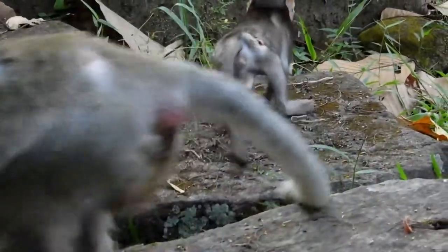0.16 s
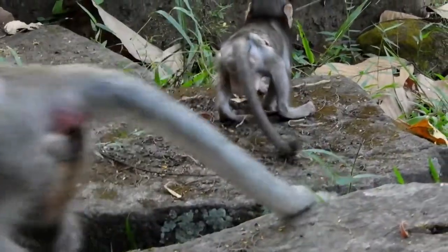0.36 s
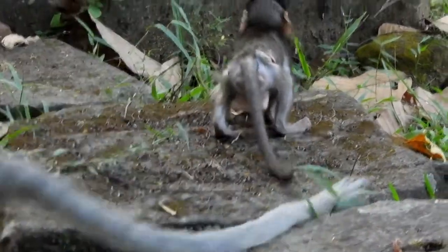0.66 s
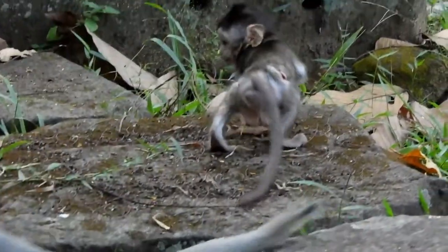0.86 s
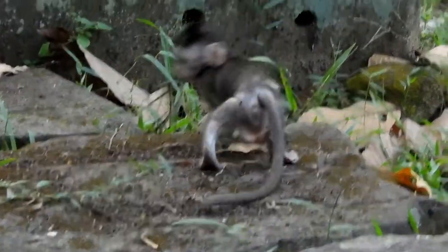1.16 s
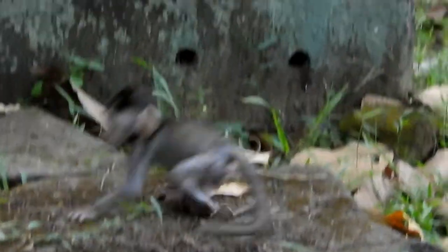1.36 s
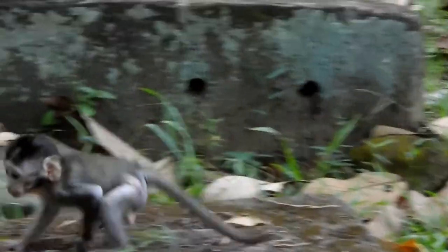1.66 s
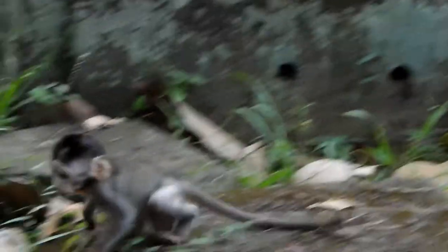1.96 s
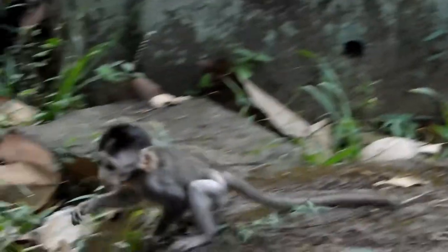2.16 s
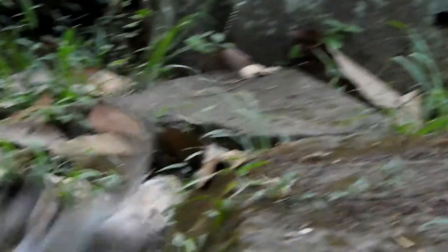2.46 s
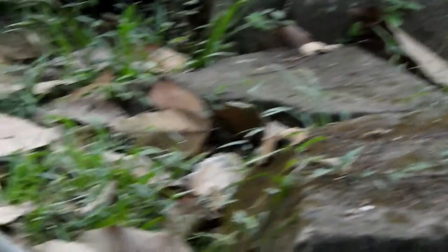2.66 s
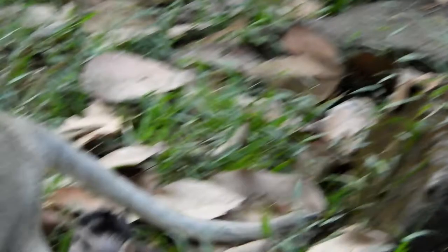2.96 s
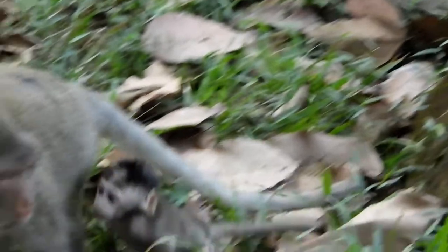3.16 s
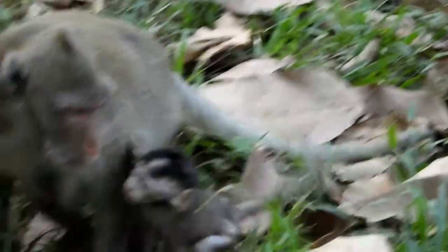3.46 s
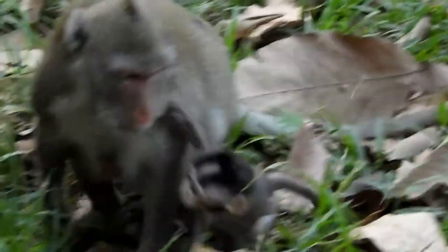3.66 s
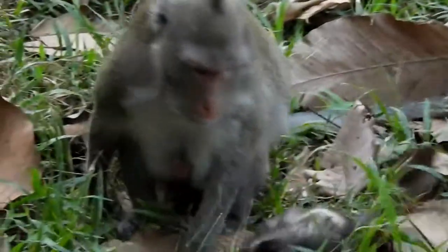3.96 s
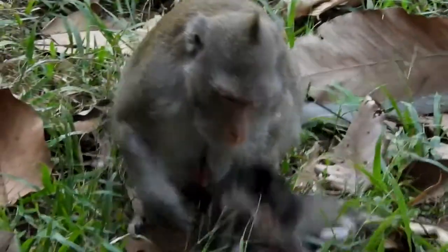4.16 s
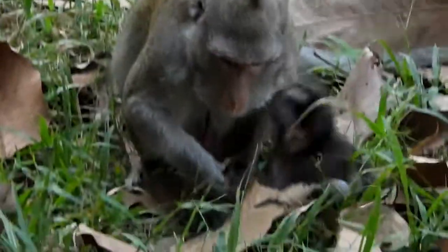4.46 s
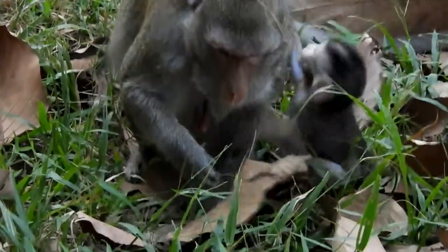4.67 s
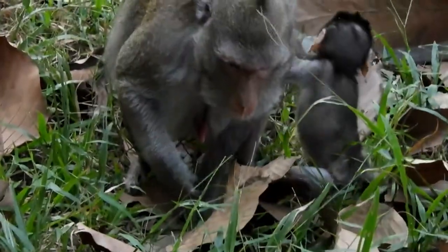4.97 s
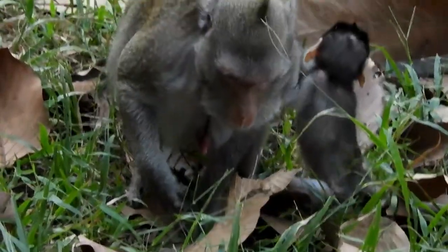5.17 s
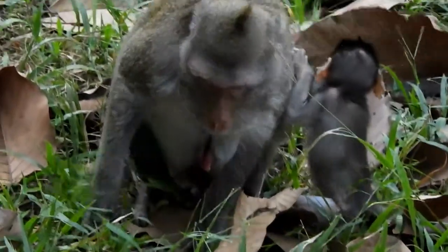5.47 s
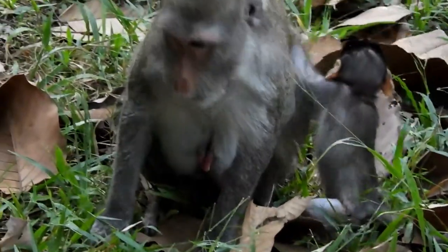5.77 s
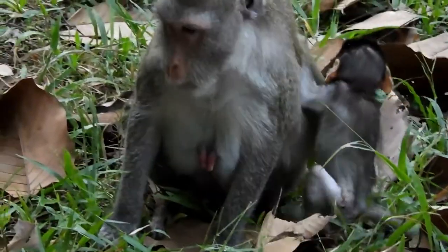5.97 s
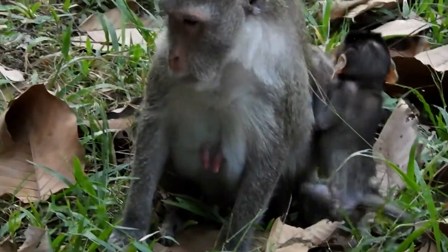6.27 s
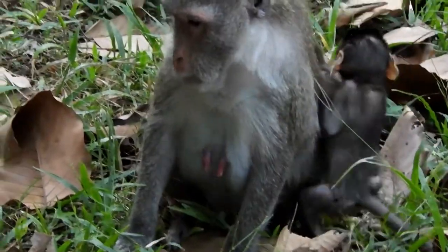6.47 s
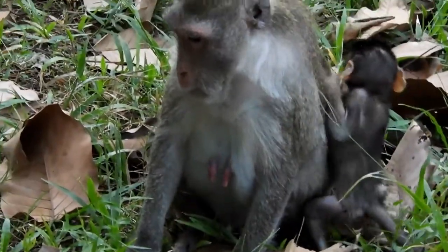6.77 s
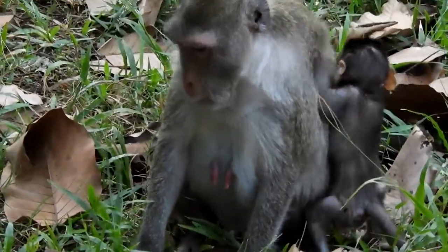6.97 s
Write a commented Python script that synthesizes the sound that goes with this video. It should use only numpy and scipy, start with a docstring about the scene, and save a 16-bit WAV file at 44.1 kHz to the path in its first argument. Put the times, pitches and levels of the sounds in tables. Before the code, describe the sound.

Throughout, cicadas hold a piercing drone near 2.7 kHz with thinner pitches above, beating, rasping and fading unevenly as they shift between the ears. Behind are blurred insect bands, airy hiss, patchy leaf litter and a low rumble with a far engine throbbing about 22 times a second. From 0 to 2.4 s, small soft feet pat dully on stone, with a crisp double snap at 1.25. At 2.5-2.6 a knock and a run of brittle snaps mark the move into dry leaves. Light crackles follow around 3.0 and 3.4; the strongest crunches and snaps come at 3.75-3.85 and 3.95. A knock and slight rustle land at 4.62, then only faint pats. Faint hoots near 2.8-3.6 and thin whistles at 4.7, 5.1, 6.3 and 6.9 barely surface. The motor slows after 5.5. Stereo, nearby steps with short, soft woodland echo.

```python
"""Woods: a monkey and its baby walk from a stone slab onto grass and dry leaves under droning cicadas.
Feet are noise-struck knocks, leaves are crackles through resonances, snaps are millisecond noise bursts.
The woods answer with a short, soft echo. Cicadas are beating sines in four partials, faded by foliage.
Behind lie blurred insect bands, coloured noise for rumble, litter, an uneven mid-high floor and hiss,
faint gliding whistles and hoots, and the low throb of a distant motor made of low-passed thumps."""
import sys
import numpy as np
from scipy import signal
from scipy.fft import rfft, irfft
from scipy.io import wavfile
from scipy.ndimage import uniform_filter1d

SR = 44100
rng = np.random.default_rng(int(sys.argv[2]) if len(sys.argv) > 2 else 0)


def materialize(psi):
    """Save the field psi as 16-bit PCM at rate SR to the path in sys.argv[1].

    A 1-D psi becomes a single channel; in a 2-D psi each row is a channel.
    """
    bounded = np.clip(np.atleast_2d(psi).T, -1, 1)
    quanta = np.round(bounded * 32767).astype(np.int16)
    wavfile.write(sys.argv[1], SR, quanta)


N = 313992
TIME = np.arange(N) / SR
FREQS = np.fft.rfftfreq(N, 1 / SR) + 1e-3  # offset keeps log finite

# Pan is left re right, positive = left. Spectra and resonances are relative.
# dry leaves crushed or brushed: t/s, crackle level/dB, leaf body level/dB, swell/s, decay/s, pan/dB
CRUNCHES = [(0.86, -49, -70, 0.0071, 0.027, 7), (0.92, -51, -73, 0.0073, 0.034, 7),
            (1.237, -31.5, -69, 0.013, 0.014, 8), (1.29, -43.5, -57, .006, 0.052, 4),
            (1.463, -63, -59.5, 0.014, 0.13, 2), (2.505, -38, -43, 0.0088, 0.15, 1),
            (2.848, -68, -45.5, 0.012, 0.006, 5), (2.978, -43, -52, 0.0043, 0.01, 3),
            (3.352, -59, -40.5, 0.0056, 0.011, 1), (3.466, -43, -43, 0.0028, .035, -2),
            (3.69, -49, -49, 0.033, 0.076, 0), (3.771, -45, -50, 0.0055, 0.021, -10),
            (3.798, -40, -31.5, 0.004, 0.021, 4), (3.809, -30, -34, 0.022, 0.013, -2),
            (3.948, -28, -27.5, 0.011, 0.0079, 0.5), (3.968, -37.5, -40, 0.0031, 0.062, -2.5),
            (4.616, -52, -45, 0.0018, 0.013, 0), (4.66, -60, -64, 0.0078, 0.23, -5),
            (5.297, -46.5, -55.5, 0.0031, 0.014, -11)]
# thin leaf edges: f/Hz, width/Hz, gain/dB
LEAF_EDGE = [(7230, 3100, -9.5), (8540, 770, 1.5), (9180, 520, 2)]
# broad leaf blades: f/Hz, width/Hz, gain/dB
LEAF_BODY = [(700, 180, -8), (915, 250, -2.5), (1220, 82, 4.5), (1570, 170, 0.5), (1890, 260, 1.5),
             (2230, 260, 2.5), (2500, 160, -1), (3400, 290, 3), (3830, 190, 3.5), (4380, 400, 5),
             (5370, 530, -6), (6560, 610, 4)]
# footfalls and knocks on stone, then on litter: t/s, level before trim/dB, f/Hz, contact/s, pan/dB
FOOTFALLS = [(0.027, -48, 1000, 0.0052, 2), (0.112, -51, 1140, 0.0052, 9), (0.311, -54, 1170, .004, 6),
             (0.427, -47.5, 1040, 0.0071, -2), (0.514, -47.5, 1150, 0.0024, 10),
             (0.606, -46, 2030, 0.0057, 2), (0.717, -49, 1860, .004, 7), (0.916, -41.5, 2000, 0.0053, 0),
             (1.228, -45.5, 1150, .005, -1), (1.631, -53, 1170, 0.0061, 5), (1.711, -50, 1070, 0.0069, 5),
             (1.909, -48.5, 1030, 0.005, 3), (2.028, -51, 1190, 0.007, 5), (2.111, -50.5, 1240, .004, -1),
             (2.32, -51.5, 1060, 0.0058, 6), (2.437, -52, 1060, 0.0048, 7), (2.5, -34, 1470, .006, 2),
             (2.68, -42, 1460, 0.0048, 4), (2.844, -45, 1730, .004, -3), (2.912, -46, 970, .004, 10),
             (3.355, -39.5, 1220, 0.0031, -4), (3.411, -36.5, 2340, 0.0022, -2),
             (3.7, -37.5, 1400, 0.013, -2), (3.802, -26.5, 1400, 0.0022, 1),
             (3.803, -37.5, 710, 0.0052, -1), (3.808, -27, 1430, 0.004, -3),
             (3.85, -33.5, 1550, 0.0012, -1), (3.95, -31, 2130, .003, -7),
             (4.615, -31.5, 1430, 0.0028, -2.5), (4.618, -37, 2500, 0.0037, 2),
             (4.653, -43, 1520, 0.0051, -2), (4.781, -52, 1130, 0.0032, 6), (4.98, -51, 1300, 0.0055, 4),
             (5.583, -53, 1130, .004, 5), (5.709, -52.5, 2100, .004, 11), (6.384, -50, 1580, 0.0046, 0)]
# stems and leaf ribs snapping: t/s, peak level before trim/dB, pan/dB
STEM_SNAPS = [(1.2445, -30, 5), (1.2544, -21, 2), (2.517, -26, -8), (2.526, -22, -1.5), (2.541, -33, 2),
              (2.568, -32, -2), (2.589, -25, 0), (2.595, -26, 1), (2.611, -31, 2), (2.98, -26.5, -14),
              (3.3648, -30, 3), (3.474, -27, -6), (3.754, -32, -5), (3.77, -23.5, -6), (3.8125, -17, -4),
              (3.822, -26, -3), (3.828, -22, -4), (3.841, -22, -4), (3.957, -22, -6), (3.9613, -15, -3),
              (3.975, -15.5, -5)]
# cicada partial 1, which fades the most: t/s, level before partial gain/dB
DRONE_FIRST = [(0.0, -64), (0.48, -49), (0.52, -56), (0.6, -46.5), (0.68, -61), (0.96, -53.5), (1.04, -70),
               (1.22, -63), (1.48, -62), (1.54, -54.5), (1.72, -52), (1.9, -65), (2.14, -50), (2.36, -64.5),
               (2.42, -50), (2.5, -61), (2.54, -44), (2.6, -60), (2.68, -48.5), (2.8, -59.5), (2.88, -51),
               (3.04, -58.5), (3.18, -46.5), (3.22, -62), (3.3, -45.5), (3.42, -65), (3.46, -49),
               (3.66, -61), (3.84, -39), (3.9, -53), (3.94, -41.5), (4.1, -62), (4.2, -52.5), (4.38, -81),
               (4.52, -69), (4.62, -49), (4.74, -60), (4.94, -49), (5.1, -62), (5.2, -46), (5.24, -67),
               (5.32, -47), (5.42, -68), (5.48, -53.5), (5.54, -81), (5.66, -55.5), (5.76, -65),
               (5.82, -42), (5.9, -60.5), (5.98, -46), (6.04, -63), (6.1, -49), (6.18, -66.5), (6.34, -49),
               (7.02, -59.5), (7.11, -48)]
# cicada partial 2, piercing: t/s, level before partial gain/dB
DRONE_SECOND = [(0.0, -57), (0.06, -62), (0.12, -43.5), (0.2, -54), (0.3, -45), (0.48, -53), (0.52, -46),
                (0.6, -50.5), (0.84, -47), (0.96, -44.5), (1.0, -54), (1.1, -46.5), (1.38, -52),
                (1.42, -46), (1.68, -44.5), (1.94, -53.5), (2.0, -45.5), (2.14, -49.5), (2.18, -39),
                (2.28, -54), (2.34, -46.5), (2.5, -53), (2.54, -45.5), (2.64, -55), (2.86, -43.0),
                (3.02, -51), (3.1, -44.5), (3.2, -53), (3.34, -49), (3.4, -56.5), (3.54, -43.5),
                (3.76, -52), (3.82, -43.5), (4.12, -48.5), (4.2, -44), (4.26, -54), (4.3, -43),
                (4.46, -55.5), (4.6, -44), (4.7, -54.5), (4.84, -44.5), (5.18, -49.5), (5.22, -45),
                (5.36, -55.5), (5.44, -43), (5.56, -51), (5.7, -50), (5.74, -42.5), (6.08, -51),
                (6.18, -46), (6.38, -53), (6.48, -47), (6.54, -57), (6.74, -42), (6.92, -48), (7.11, -50.5)]
# cicada partial 3, thin: t/s, level before partial gain/dB
DRONE_THIRD = [(0.0, -49), (0.22, -53.5), (0.46, -44.5), (0.86, -57), (0.96, -45), (1.02, -72), (1.1, -58),
               (1.22, -45), (1.32, -44), (1.44, -56), (1.48, -50), (1.74, -64), (1.78, -48.5),
               (2.82, -51.5), (2.9, -44.5), (2.96, -53), (3.02, -43), (3.08, -56), (3.12, -46.5),
               (3.74, -49), (3.8, -46.5), (3.94, -47), (4.5, -49), (4.58, -66), (4.64, -44), (4.72, -58),
               (4.78, -45), (5.2, -54), (5.34, -48), (5.42, -54), (5.48, -49), (6.26, -48.5), (6.32, -57),
               (6.52, -47), (6.68, -53), (6.76, -40), (6.84, -57), (6.88, -45), (7.08, -59), (7.11, -51)]
# four partials through the foliage: gain/dB, random fading depth/dB, rasp depth (0-1), share of pan (0-1)
PARTIALS = [(2.77, 1.0, 0.34, 1), (2.5, 0.93, 0.3, 0.98), (1.43, 1.36, 0.02, 1), (0.5, 4, 0.6, 0.31)]
# place of the three lower partials as foliage shifts: t/s, pan 1/dB, pan 2/dB, pan 3/dB
DRONE_PLACE = [(0.0, 9, -9, -7), (0.2, 25, 1.0, -4), (0.28, -4, 1.5, -2.5), (0.48, 16, -1.5, -1),
               (1.13, -10, 4, -1.0), (1.25, 4.0, 2.0, 0), (1.47, -3.5, 4.5, 5), (1.55, 10.0, 6, 1.0),
               (1.86, -6, -6, 3), (2.04, 10, 3.0, -4), (2.14, -6, -3, 9), (2.28, 11, 6, 0.5),
               (2.7, -10, -1.0, 0.5), (2.74, 4.5, 3, -2.0), (4.96, 0, 0.5, -2.5), (5.02, 2, -3.0, -9),
               (5.47, 12, 4, -3), (5.51, 5, -12, 1), (6.13, 5, 8, -4), (6.21, 9, -5.0, -1.5),
               (6.45, 2, 2.5, -1), (6.5, 9, 2.0, -8), (7.08, 3, 1, 1.0), (7.12, 13.5, -2.5, -13)]
# farther, looser insect chorus: f/Hz, width/Hz, level/dB
FAR_CHORUS = [(2617, 140, -61.5), (5170, 240, -53.5), (5490, 310, -59.5), (5990, 72, -66.5),
              (6420, 120, -73), (7867, 590, -52.5), (8580, 230, -68), (9100, 560, -68.5)]
# faint far whistles and hoots: t/s, length/s, start f/Hz, end f/Hz, level before blur/dB
WHISTLES = [(2.83, 0.42, 685, 645, -63), (3.22, 0.42, 635, 660, -65), (4.66, 0.12, 3420, 3400, -59),
            (5.13, 0.22, 3670, 3510, -55), (6.297, 0.344, 3870, 3830, -58), (6.93, 0.24, 1930, 1830, -60)]
# uneven mid-high noise floor, 3-5 kHz: t/s, level before trim/dB
MID_HIGH_LEVEL = [(0.0, -65), (0.32, -56.5), (0.36, -61), (0.6, -56.5), (0.84, -61.5), (0.88, -54),
                  (1.16, -66), (1.28, -60), (1.46, -74), (1.52, -52), (1.64, -66), (1.94, -55.5),
                  (2.2, -60), (2.48, -57), (2.7, -51.5), (2.82, -69), (2.98, -49), (3.02, -57), (3.3, -60),
                  (3.36, -52), (3.44, -55), (3.54, -50.5), (3.58, -54), (3.62, -49.5), (3.74, -53),
                  (3.8, -68), (3.92, -49), (3.94, -67), (4.1, -57), (4.24, -58), (4.3, -52.5), (4.46, -69),
                  (4.58, -65), (4.66, -50), (4.82, -65), (4.9, -54.5), (5.34, -60), (5.52, -55),
                  (5.58, -59), (5.84, -54.5), (5.96, -61), (6.02, -58.5), (6.3, -65.5), (6.4, -52.5),
                  (6.6, -57), (6.66, -65.5), (6.76, -54), (7.11, -59.5)]
# mid-high colour: f/Hz, density/dB per Hz
MID_HIGH_COLOUR = [(1200, -36), (2400, -9), (3100, -6), (3700, -1), (4400, 1.5), (5000, 0.5), (6500, -2.5),
                   (12000, -52)]
# faint rustle of leaf litter: t/s, level before trim/dB
LITTER_LEVEL = [(0.0, -61.5), (0.3, -63.5), (0.42, -56.5), (0.74, -62), (0.84, -66.5), (0.96, -62.5),
                (1.2, -62.5), (1.26, -63), (1.42, -64.5), (1.48, -61.5), (1.84, -62), (1.96, -64.5),
                (2.42, -65.5), (2.5, -56.5), (2.68, -61), (2.78, -59.5), (3.04, -55.5), (3.22, -59.5),
                (3.44, -50), (3.68, -57.5), (3.8, -51), (3.92, -50), (3.94, -48), (4.1, -59.5), (4.22, -56),
                (4.48, -72.5), (4.56, -66), (4.66, -56), (4.7, -60.5), (4.8, -54.5), (4.86, -69),
                (4.96, -60.5), (5.14, -61.5), (5.58, -59.5), (5.66, -62.5), (6.0, -67.5), (6.2, -68.5),
                (6.4, -60), (6.7, -67.5), (6.74, -59), (6.96, -62.5), (6.98, -56), (7.11, -59)]
# litter colour: f/Hz, density/dB per Hz
LITTER_COLOUR = [(250, -20), (500, -15.5), (680, -11.5), (900, -6), (1350, -3), (1650, -3), (2000, -5),
                 (2400, -5), (2900, -5), (3600, -12.5), (8000, -26), (12000, -43)]
# high hiss: t/s, level before trim/dB
HISS_LEVEL = [(0.0, -52), (0.94, -52.5), (1.02, -53), (1.34, -52), (1.44, -60), (1.56, -45.5), (1.7, -55),
              (2.1, -48.5), (2.2, -55.5), (2.68, -52), (2.94, -63), (2.98, -49), (3.2, -55), (3.38, -46.5),
              (3.44, -56), (3.46, -52), (3.68, -49), (3.8, -59), (3.92, -48), (3.94, -50), (4.12, -48.5),
              (4.56, -59.5), (5.0, -53), (5.26, -63), (5.3, -52.5), (5.68, -55), (6.1, -52), (6.3, -59.5),
              (6.46, -49), (6.68, -56.5), (6.78, -51.5), (7.11, -56)]
# hiss colour: f/Hz, density/dB per Hz
HISS_COLOUR = [(3500, -31.5), (4700, -14), (5600, -7.5), (6200, -7.5), (7200, -3.5), (8350, 2), (8900, -1),
               (9500, -6), (10200, -7), (10600, -9), (10900, -8), (11400, -21.5), (12200, -34.5),
               (13800, -30), (15000, -50)]
# low rumble, also the motor's reference: t/s, level before trim/dB
RUMBLE_LEVEL = [(0.0, -65), (0.29, -69), (0.42, -57.5), (0.54, -71.5), (1.81, -68.5), (1.89, -61),
                (2.15, -73), (2.71, -64.5), (2.8, -70.5), (3.16, -61.5), (3.25, -63.5), (3.56, -58.5),
                (4.33, -57), (4.55, -67), (5.0, -60), (5.65, -66), (6.38, -63), (7.12, -70)]
# rumble colour: f/Hz, density/dB per Hz
RUMBLE_COLOUR = [(15, -43), (25, -20), (75, 0.5), (119, 0.5), (184, -5), (262, -20), (420, -22), (550, -55),
                 (920, -120)]
# likeness of the ears in diffuse noise: f/Hz, correlation (-1 to 1)
LIKENESS = [(60, 0.78), (180, 0.86), (350, 0.35), (650, 0.32), (900, 0.75), (1400, 0.62), (2500, 0.55),
            (3800, 0.15), (5200, 0.49), (7000, 0), (9000, 0), (14000, 0)]
# far motor speed, slackening near the end: t/s, firing rate/Hz
MOTOR_SPEED = [(0, 21.6), (3.0, 21.7), (4.2, 22.2), (5.2, 21.9), (5.6, 21.2), (6.0, 20.0), (6.4, 19.5),
               (7.12, 19.5)]
# motor level re RUMBLE_LEVEL: t/s, level/dB
MOTOR_SHARE = [(0, -7.5), (3.2, -5.5), (4.2, -1.5), (5.3, -2), (6.4, -5), (7.12, -6)]
# boom of the far motor: f/Hz, width/Hz, gain/dB
MOTOR_BODY = [(120.5, 104, 0)]

WOODS_T60_S, WOODS_DB = 0.18, -6


def crunches(clump_db=2.0, fold_db=2.0):
    """Weight comes onto a leaf, it crackles in clumps, and the crackle dies away."""
    edge = crackle(LEAF_EDGE, per_s=1600, size_db=3.0, shared=0.1)
    edge = cut(edge, 10600, "low", order=6)
    edge = rms_one(cut(edge, 3800, "high") * from_db(clump_db * drift(120)))
    body = crackle(LEAF_BODY, per_s=3500, size_db=1.0, shared=1.0)
    body = cut(body, 515, "high", order=4)
    body = rms_one(body * from_db(fold_db * drift(150)))
    out = np.zeros((2, N))
    t = TIME[:SR // 2]
    for start_s, edge_db, body_db, swell_s, decay_s, pan_db in CRUNCHES:
        start = round(start_s * SR)
        at = slice(start, start + SR // 2)
        press = np.minimum(t / swell_s, 1) * np.exp(-np.maximum(t - swell_s, 0) / decay_s)
        leaf = from_db(edge_db) * edge[:, at] + from_db(body_db) * body[:, at]
        add(out, start_s, panned(press * leaf, pan_db))
    return out


def crackle(modes, per_s, size_db, shared):
    """Tiny fractures of uneven size each ring one leaf resonance; a share reaches both ears alike."""
    sizes = from_db(size_db * np.minimum(rng.exponential(1, (3, N)), 3))
    sizes = sizes * rng.choice([-1, 1], (3, N))
    clicks = sizes * (rng.random((3, N)) < per_s / SR)
    ears = np.sqrt(shared) * clicks[0] + np.sqrt(1 - shared) * clicks[1:]
    dealt = rng.integers(0, len(modes), N)  # mode rung by each click
    rung = 0
    for k, mode in enumerate(modes):
        rung = rung + resonate(ears * (dealt == k) + 1e-18, [mode])
    return rms_one(rung)


def pats(trim_db=-12.5, width_hz=480):
    """A soft foot lands over a few milliseconds and knocks the ground at one dull pitch."""
    out = np.zeros((2, N))
    for start_s, level_db, pitch_hz, contact_s, pan_db in FOOTFALLS:
        pat = from_db(level_db + trim_db) * knock(pitch_hz, width_hz, contact_s)
        add(out, start_s - .001, panned(pat, pan_db))
    return out


def knock(pitch_hz, width_hz, contact_s):
    """A brief rubbing contact rings at one pitch; rms 1 over 40 ms."""
    t, mode = TIME[:SR // 25], [(pitch_hz, width_hz, 0)]
    touch = rng.standard_normal(len(t)) * t * np.exp(-t / contact_s)
    return rms_one(resonate(resonate(touch, mode), mode))


def snaps(trim_db=-4, decay_s=0.0011):
    """A stem breaks in about a millisecond: a noise burst through the leaf-edge resonances."""
    out, t = np.zeros((2, N)), TIME[:SR // 50]
    for start_s, peak_db, pan_db in STEM_SNAPS:
        burst = rng.standard_normal(len(t)) * np.exp(-t / decay_s)
        crack = cut(resonate(burst, LEAF_EDGE), 10600, "low", order=6)
        crack = crack / np.abs(crack).max()
        add(out, start_s, panned(from_db(peak_db + trim_db) * crack, pan_db))
    return out


def cicadas(count=6, pitch_hz=2699, spread_hz=11, waver_hz=12, farther_db=1.0,
            flutter_db=2.0, sway_rad=0.81, ear_lag_s=.00003, top_db=-67):
    """Singers near one pitch, each farther, beat; swaying foliage fades and shifts each partial."""
    offsets = np.linspace(1, -1, count)
    pitches_hz = [pitch_hz + spread_hz * offset + waver_hz * drift(40) for offset in offsets]
    phases = 2 * np.pi * np.cumsum(pitches_hz, axis=1) / SR
    nearness = from_db(-farther_db * np.arange(count))
    sway = sway_rad * np.array([drift(1.66) for singer in range(count)])
    levels_db = in_time(DRONE_FIRST) + in_time(DRONE_SECOND) + in_time(DRONE_THIRD) + [top_db]
    pans_db = in_time(DRONE_PLACE)
    pans_db = pans_db + pans_db[-1:]  # top partial follows the third
    out = 0
    for k, (level_db, pan_db, partial) in enumerate(zip(levels_db, pans_db, PARTIALS), 1):
        gain_db, fading_db, rasp, pan_share = partial
        lag = 2 * np.pi * k * pitch_hz * ear_lag_s  # right ear later: singers a little to the left
        left = nearness @ np.sin(k * phases)
        right = nearness @ np.sin(k * phases - lag + sway)
        # uneven tymbal strokes roughen the tone
        buzz = from_db(flutter_db * drift(43)) * (1 + rasp * drift(230))
        tone = panned(np.array([left, right]) * buzz, pan_share * pan_db)
        # level out over 1/14 s, so the level curve rules the slow swells
        local_rms = np.sqrt(uniform_filter1d(np.mean(tone ** 2, axis=0), SR // 14) + 1e-9)
        out = out + from_db(level_db + gain_db + fading_db * drift(17)) * tone / local_rms
    return out


def far_chorus(swell_db=1.8):
    """Many distant insects blur into broad humming bands that hardly swell."""
    out = 0
    for centre_hz, width_hz, level_db in FAR_CHORUS:
        band = diffuse(1 / (1 + np.abs(2 * (FREQS - centre_hz) / width_hz) ** 3))
        out = out + from_db(level_db + swell_db * drift(17.0)) * band
    return out


def whistles(blur_hz=30, direct=0.43):
    """Thin gliding notes; most of their sound is scattered by the trees, which blurs the pitch."""
    out = np.zeros((1, N))
    in_step, across = direct + drift(blur_hz) / 2, drift(blur_hz) / 2
    for start_s, length_s, start_hz, end_hz, level_db in WHISTLES:
        size = int(length_s * SR)
        phase = 2 * np.pi * np.cumsum(np.linspace(start_hz, end_hz, size)) / SR
        at = (round(start_s * SR) + np.arange(size)) % N
        note = in_step[at] * np.sin(phase) + across[at] * np.cos(phase)
        add(out, start_s, from_db(level_db) * signal.windows.tukey(size, .5) * note)
    return out


def mid_high_floor(trim_db=2.0, flicker_db=1.87):
    """Mid-high coloured noise with fast gaps and flicker in each band."""
    level_db = in_time(MID_HIGH_LEVEL)[0] + trim_db + flicker_db * drift(19)
    noise = diffuse(from_db(over_hz(MID_HIGH_COLOUR)))
    return from_db(level_db) * patchy(noise, depth_db=3.5, corner_hz=27.0, count=20)


def litter(trim_db=0.5, stir_db=1.87, grain_db=1.0):
    """Restless leaf litter: patchy coloured noise with a slow stir and a fast grain."""
    level_db = in_time(LITTER_LEVEL)[0] + trim_db + stir_db * drift(7.8) + grain_db * drift(84)
    leaves = patchy(diffuse(from_db(over_hz(LITTER_COLOUR))), depth_db=4.0, corner_hz=9.8)
    return from_db(level_db) * panned(leaves, pan_db=1.0)


def hiss(trim_db=1.5):
    """Hiss of far insects: high coloured noise, patchy over the spectrum."""
    air = patchy(diffuse(from_db(over_hz(HISS_COLOUR))), depth_db=2.5, corner_hz=13.7)
    return from_db(in_time(HISS_LEVEL)[0] + trim_db) * air


def rumble(trim_db=-3.5, throb_db=2.0):
    """Low rumble: bass-heavy noise with an irregular throb."""
    level_db = in_time(RUMBLE_LEVEL)[0] + trim_db + throb_db * drift(12)
    return from_db(level_db) * panned(diffuse(from_db(over_hz(RUMBLE_COLOUR))), pan_db=-2.0)


def motor(uneven_db=2.0, echo_db=-5):
    """Regular thumps, like an idling engine; only the bass carries, smeared, through the trees."""
    firings_per_s, share_db = in_time(MOTOR_SPEED) + in_time(MOTOR_SHARE)
    turns = np.floor(np.cumsum(firings_per_s) / SR)
    thumps = np.diff(turns, prepend=0) * from_db(uneven_db * drift(23)) + 1e-18
    thumps = thumps + from_db(echo_db) * woods(thumps, WOODS_T60_S)[0]
    boom = resonate(resonate(thumps, MOTOR_BODY), MOTOR_BODY)
    chug = rms_one(cut(boom, 197, "low", order=6))
    return from_db(in_time(RUMBLE_LEVEL)[0] + share_db) * panned(chug, pan_db=0.2)


def woods(x, t60_s):
    """Scatter from trunks and foliage: a dying cloud of echoes, different at each ear."""
    t = TIME[:SR]
    echoes = rng.standard_normal((2, SR)) * from_db(-60 * t / t60_s)
    echoes *= 1 - np.exp(-t / 0.0045)  # soft onset
    echoes /= np.sqrt(np.sum(echoes ** 2, axis=1, keepdims=True))
    return signal.fftconvolve(np.atleast_2d(x), echoes, axes=1)[:, :N]


def diffuse(gain):
    """Stereo noise of a given colour, ears correlated as in LIKENESS; rms 1."""
    alike = np.clip(over_hz(LIKENESS), -1, 1)
    mid, side = rfft(rng.standard_normal((2, N)))
    mid = np.sqrt(1 + alike) * mid
    side = np.sqrt(1 - alike) * side
    return rms_one(irfft(gain * (mid + side * [[1], [-1]]), N))


def patchy(x, depth_db, corner_hz, count=12):
    """Each part of the spectrum flickers on its own; rms 1."""
    spectrum, centres = rfft(x), np.log(np.geomspace(600, 9000, count))
    out = 0
    for share in np.eye(count):  # overlapping triangular bands on a log axis
        band = irfft(spectrum * np.interp(np.log(FREQS), centres, share), N)
        out = out + band * from_db(depth_db * drift(corner_hz))
    return rms_one(out)


def resonate(x, modes):
    """Parallel two-pole resonances with alternating signs."""
    out = 0
    for k, (centre_hz, width_hz, gain_db) in enumerate(modes):
        r = np.exp(-np.pi * width_hz / SR)
        poles = [1, -2 * r * np.cos(2 * np.pi * centre_hz / SR), r * r]
        gain = (-1) ** k * from_db(gain_db) * (1 - r * r) / 2
        out = out + gain * signal.lfilter([1, 0, -1], poles, x)
    return out


def cut(x, corner_hz, kind, order=2):
    """Butterworth high- or low-pass."""
    sos = signal.butter(order, min(corner_hz, .45 * SR), kind, fs=SR, output="sos")
    return signal.sosfilt(sos, x)


def drift(corner_hz):
    """Slow chance with spread 1: noise at SR/40 through a double one-pole low-pass."""
    r = np.exp(-80 * np.pi * corner_hz / SR)
    noise = rng.standard_normal(N // 40 + 2002)
    slow = signal.lfilter([1], [1, -2 * r, r * r], noise)[2000:]  # drop the filter's run-in
    return np.interp(np.arange(N) / 40, np.arange(len(slow)), rms_one(slow))


def in_time(rows):
    """Each column of a curve at every sample."""
    t_s, *columns = np.transpose(rows)
    return [np.interp(TIME, t_s, column) for column in columns]


def over_hz(points):
    """A short spectrum joined on a log-frequency axis."""
    f_hz, value = np.transpose(points)
    return np.interp(np.log(FREQS), np.log(f_hz), value)


def from_db(db):
    """Decibels to gain."""
    return 10 ** (np.asarray(db) / 20)


def rms_one(x):
    """Scale to rms 1."""
    return x / np.sqrt(np.mean(x ** 2) + 1e-20)


def panned(x, pan_db):
    """Split a level difference between left and right."""
    return x * from_db(np.array([[.5], [-.5]]) * pan_db)


def add(out, start_s, x):
    """Mix a short sound in at a time."""
    start = max(round(start_s * SR), 0)
    out[:, start:start + x.shape[-1]] += x[..., :N - start]


def scene():
    """Near footsteps with their echo, inside the insect chorus."""
    steps = crunches() + pats() + snaps()
    echo = from_db(WOODS_DB) * woods(steps, WOODS_T60_S)
    insects = cicadas() + far_chorus()
    background = whistles() + mid_high_floor() + litter() + hiss() + rumble() + motor()
    return steps + echo + insects + background


def record(dry):
    """The top is cut steeply: 70 dB down from 15.7 kHz."""
    return signal.sosfilt(signal.cheby2(14, 70, 15700, fs=SR, output="sos"), dry)


dry = scene()
out = record(dry)
materialize(out)
```